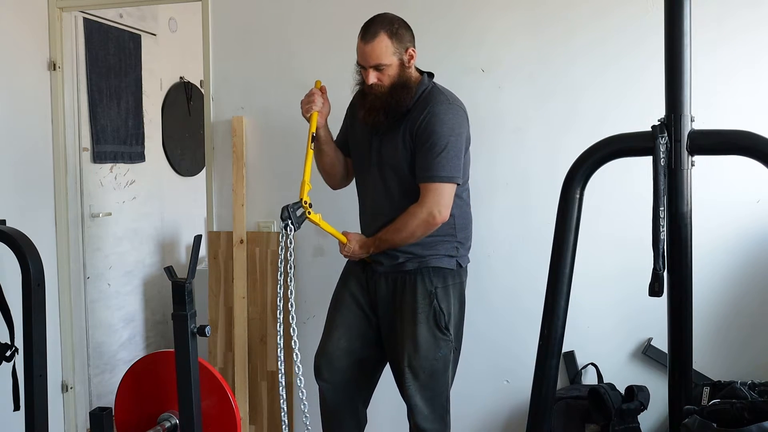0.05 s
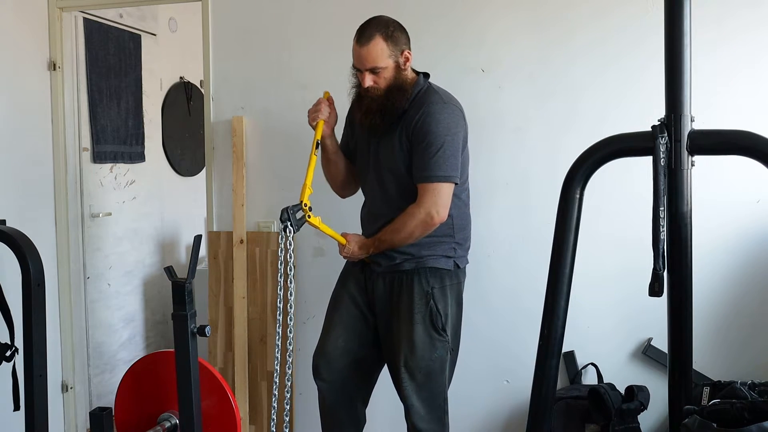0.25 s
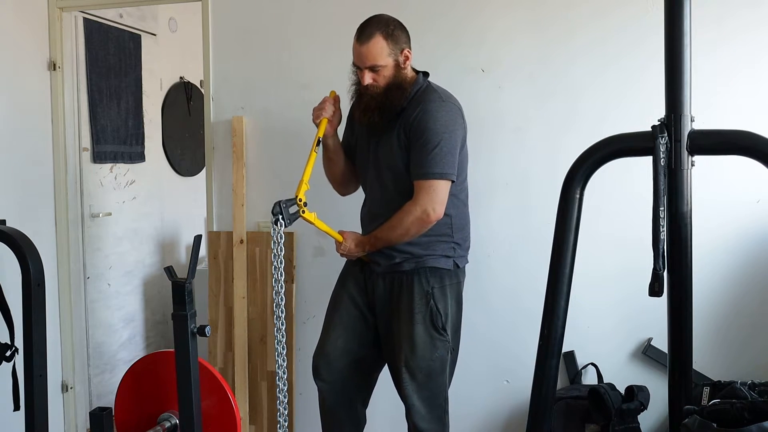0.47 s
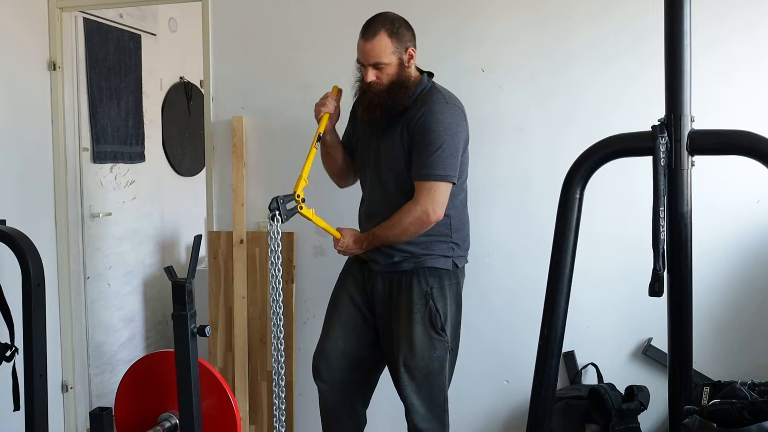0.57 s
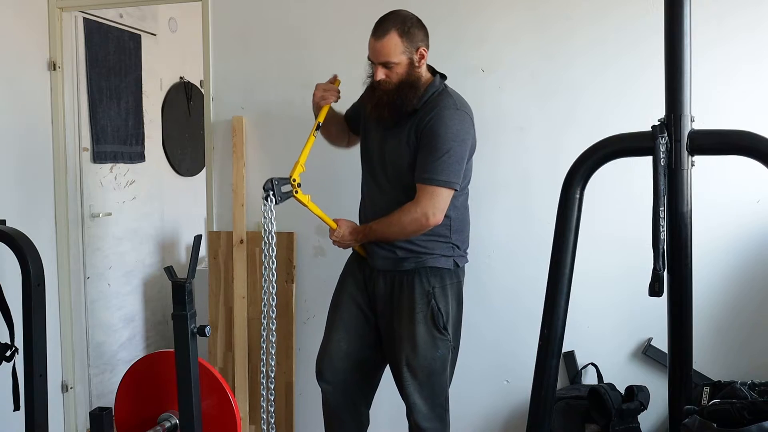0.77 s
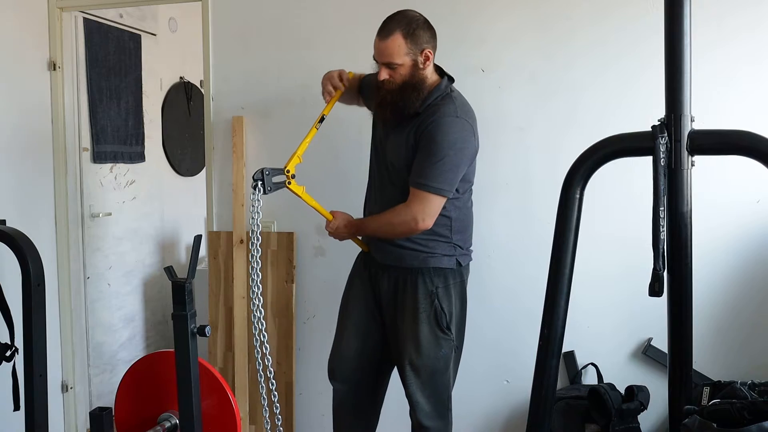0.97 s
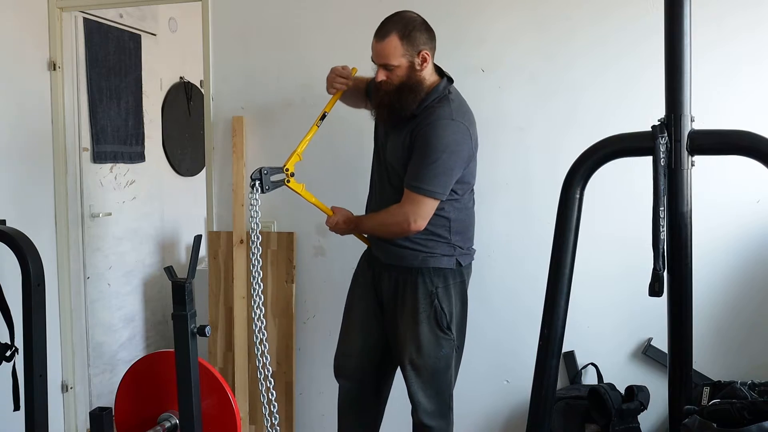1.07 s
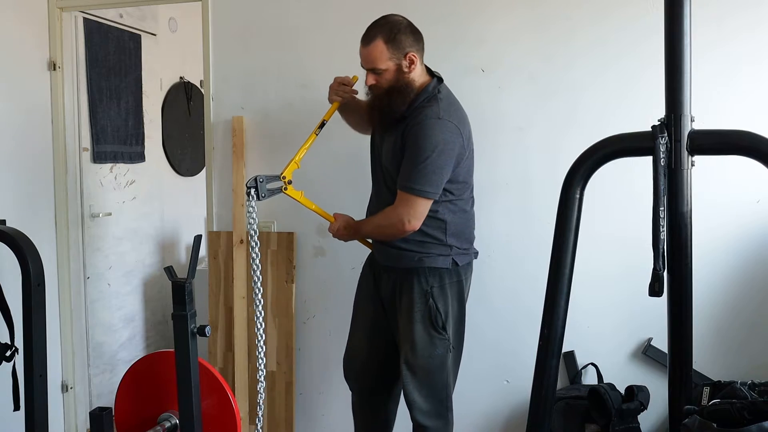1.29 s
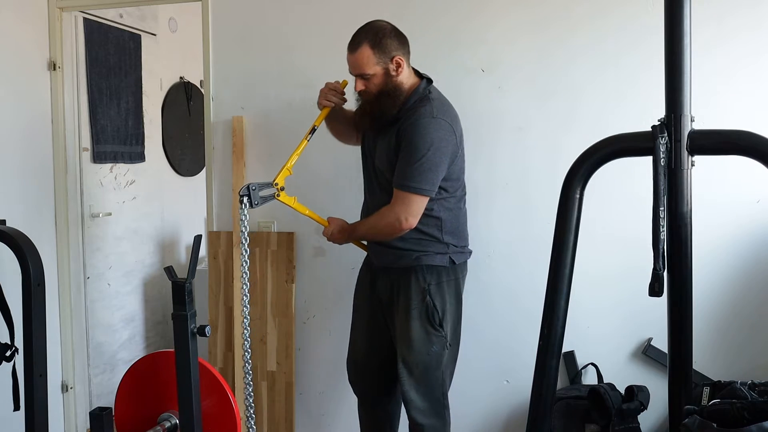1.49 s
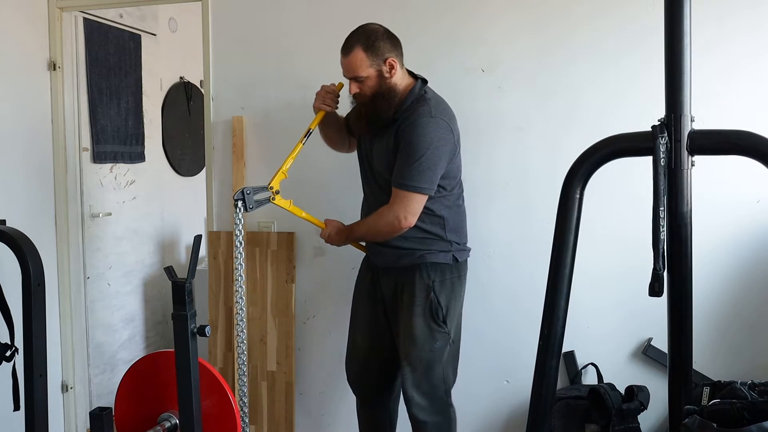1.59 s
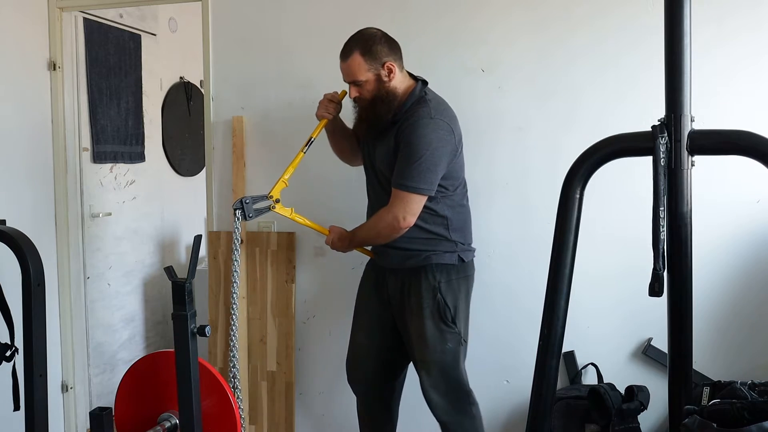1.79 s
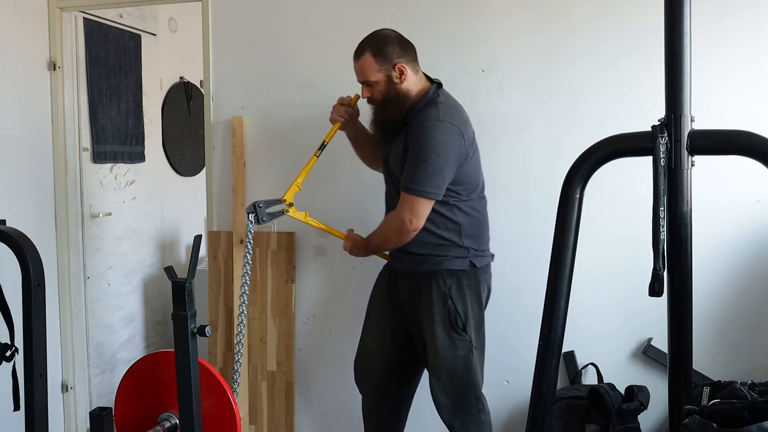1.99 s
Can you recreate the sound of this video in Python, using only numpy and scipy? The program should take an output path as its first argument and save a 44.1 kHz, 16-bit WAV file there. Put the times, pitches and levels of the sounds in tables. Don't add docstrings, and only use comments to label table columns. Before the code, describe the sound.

Bolt cutters clank hard on a steel chain, ringing briefly, then light link clicks and scuffs

```python
import sys
import numpy as np
from scipy import signal
from scipy.io import wavfile
from scipy.ndimage import uniform_filter1d

SR = 44100
rng = np.random.default_rng(int(sys.argv[2]) if len(sys.argv) > 2 else 0)


def ratio_of_db(decibels):
    return 10 ** (np.asarray(decibels, float) / 20)


def digitize_waveform(pressure):
    field = np.atleast_2d(pressure).T
    bounded = np.clip(field, -1, 1)
    quanta = np.round(bounded * 32767).astype(np.int16)
    wavfile.write(sys.argv[1], SR, quanta)


N = 90404
LEAD_S = 0.1
M = N + round(LEAD_S * SR)


def evened(x):
    return x / np.sqrt(np.mean(x ** 2) + 1e-20)


def read(points, hz):
    f, value = np.transpose(points)
    return np.interp(np.log(hz + 1), np.log(f + 1), value)


def add(mix, start_s, sound):
    part = mix[round((start_s + LEAD_S) * SR):][:len(sound)]
    part += sound[:len(part)]


def high_pass(x, hz):
    return signal.sosfilt(signal.butter(N=4, Wn=hz, btype="high", fs=SR, output="sos"), x)


def click(tone, tilt_db=0):
    hz = abs(np.fft.fftfreq(2048, 1 / SR))
    gain_db = read(tone, hz) + tilt_db * np.log2((hz + 200) / 4000)
    log_gain = np.log(ratio_of_db(np.maximum(gain_db, -80)))
    pulse = np.fft.ifft(np.exp(np.conj(signal.hilbert(log_gain)))).real[:1024]
    return pulse / np.linalg.norm(pulse)


def ring(modes, spread_db=4.5):
    flutter_db, flutter_s = 3.0, 0.015
    t = np.arange(SR) / SR
    knots_s = np.arange(0, 1 + flutter_s, flutter_s)
    out = np.zeros(SR)
    for hz, db, t60_s in modes:
        luck_db = spread_db * rng.standard_normal()
        waver_db = flutter_db * np.interp(t, knots_s, rng.standard_normal(len(knots_s)))
        out += ratio_of_db(db + luck_db + waver_db - 60 * t / t60_s) * np.sin(2 * np.pi * hz * t)
    return out


def room(x, tail_db, echo=1):
    # freq_hz, t60_s
    decay = [(200, 0.16), (800, 0.72), (2000, 0.46), (4000, 0.58), (8000, 0.41), (15000, 0.26)]
    # freq_hz, share common to both ears
    tail_shared = [(150, 1), (500, 0.87), (1500, 0), (8000, 0.46)]
    # delay_s, left_gain, right_gain
    echoes = [(.0016, .4, .3), (.0053, .6, .4), (.008, .2, .3), (.0118, .4, .3), (.0147, .3, .35),
              (.0205, .7, .4)]
    hold_s, rise_s, direct_pan_db = 0.028, 0.003, 2

    hz, t, z = signal.stft(rng.standard_normal((3, SR)), SR, nperseg=256)
    shared = np.clip(read(tail_shared, hz), 0, 1)[:, None]
    z = shared * z[2] + np.sqrt(1 - shared ** 2) * z[:2]
    z = z * ratio_of_db(-60 * np.maximum(t - hold_s, 0) / read(decay, hz)[:, None])
    tail = signal.istft(z, SR, nperseg=256)[1][:, :SR]
    tail = tail * (1 - np.exp(-np.arange(SR) / SR / rise_s))
    tail = ratio_of_db(tail_db) * tail / np.linalg.norm(tail[0])

    tail[:, 0] += ratio_of_db(np.array([direct_pan_db, -direct_pan_db]) / 2)
    for delay_s, left, right in echoes:
        at = round(delay_s * SR) + rng.integers(0, 6, 2)
        tail[[0, 1], at] += echo * left, echo * right
    return signal.fftconvolve(x[None], tail, axes=1)[:, M - N:M]


def blows(rows, tone, modes, crack_s, tail_db, ring_tail_db):
    steel_low_hz = 475
    cracks, rings, t = np.zeros(M), np.zeros(M), np.arange(1500) / SR
    for start_s, blow_db, ring_db in rows:
        crack = rng.standard_normal(1500) * np.exp(-t / crack_s)
        crack[0] += 2.5
        crack = crack / np.linalg.norm(crack)
        add(cracks, start_s, ratio_of_db(blow_db) * np.convolve(crack, click(tone)))
        add(rings, start_s, ratio_of_db(ring_db - 12) * ring(modes))
    return high_pass(room(cracks, tail_db) + room(rings, ring_tail_db), steel_low_hz)


def hiss():
    # freq_hz, level_db
    hiss_tone = [(25, -11), (60, -14), (154, -5.5), (400, -12), (1220, -13.5), (3000, -21), (15600, -31.5),
                 (16100, -75)]
    # freq_hz, correlation of the two ears
    likeness = [(60, 0.94), (200, 0.82), (550, 0.68), (1650, 0.23), (5000, 0.01)]
    level_db = -54.5

    frames, hz = N // 256 + 5, np.fft.rfftfreq(1024, 1 / SR)
    a, b, c, d = rng.standard_normal((frames, 513, 4)).T
    same = np.clip(read(likeness, hz), -1, 1)[:, None]
    left = a + 1j * b
    right = same * left + np.sqrt(1 - same ** 2) * (c + 1j * d)
    z = np.array([left, right]) * ratio_of_db(read(hiss_tone, hz))[:, None]
    out = signal.istft(z, nperseg=1024, noverlap=768)[1][:, :N]
    return ratio_of_db(level_db + 1) * evened(out)


def hum():
    # freq_hz, width_hz, level_db
    lines = [(153.3, 3, -62), (126.7, 7.1, -62), (201, 9.2, -71.5), (60.4, 13, -87)]
    swell_s, swell_width_s, swell_peak_db = 1.44, 0.22, 5

    t, out = np.arange(N) / SR, np.zeros(N)
    swell_db = swell_peak_db * np.exp(-((t - swell_s) / swell_width_s) ** 2)
    for hz, width_hz, db in lines:
        r = np.exp(-np.pi * width_hz / SR)
        noise = rng.standard_normal(N) + 1j * rng.standard_normal(N)
        slow = signal.lfilter([1], [1, -r], noise)
        out += ratio_of_db(db + swell_db) * evened((slow * np.exp(2j * np.pi * hz * t)).real)
    return out


def room_floor():
    return (hiss() + hum()) * ratio_of_db(np.array([[0.4], [-0.4]]))


def scuffs():
    # start_s, rise_s, hold_s, level_db, tilt_db_per_octave
    strokes = [
        (0.518, 0.0029, 0.016, -50.5, 1.5),
        (0.56, 0.0033, 0.033, -46.5, 2.5),
        (1.40, 0.032, 0.035, -47.5, -1.5),
        (1.46, 0.033, 0.036, -78, -3),
        (1.626, 0.0031, 0.021, -37, 4.5),
        (1.918, 0.007, 0.015, -56, -3),
        (1, 0.11, 0.4, -69, -4),
    ]
    # freq_hz, level_db
    scuff_tone = [(300, -47), (800, -15.5), (1500, -8.5), (3240, -4), (6000, -6), (9490, -13), (15400, -22),
                  (16300, -38)]
    grains_per_s, grain_spread_db, release_s = 9000, 3.0, 0.012

    out, t = np.zeros(M), np.arange(SR // 2) / SR
    for start_s, rise_s, hold_s, db, tilt_db in strokes:
        release = np.exp(-np.maximum(t - rise_s - hold_s, 0) / release_s)
        stroke = np.minimum(t / rise_s, 1) ** 2 * release
        size = ratio_of_db(grain_spread_db * np.minimum(rng.exponential(1, len(t)), 3))
        size = size * rng.choice([-1., 1.], len(t))
        grains = evened(size * (rng.random(len(t)) < grains_per_s / SR))
        add(out, start_s, ratio_of_db(db) * np.convolve(grains * stroke, click(scuff_tone, tilt_db)))
    return room(out, tail_db=5.5)


def knocks():
    # start_s, level_db, freq_hz, width_hz
    hits = [
        (0.5243, -49, 68.5, 40.3),
        (0.5218, -41.5, 213, 150),
        (.523, -37, 705, 800),
        (1.461, -35, 1710, 506),
        (1.662, -31, 1404, 830),
    ]
    out, t = np.zeros(M), np.arange(1600) / SR
    for start_s, db, hz, width_hz in hits:
        body = t * np.exp(-2 * np.pi * width_hz * t) * np.sin(2 * np.pi * hz * t)
        puff = np.convolve(rng.standard_normal(1600) * np.exp(-t / 0.0047), body)
        add(out, start_s, ratio_of_db(db) * puff / abs(puff).max())
    return room(out, tail_db=6)


def tinks():
    # start_s, level_db, freq_hz, t60_s
    touches = [(0.2088, -17, 7600, 0.035), (0.2113, -10.5, 9570, .04), (0.526, -48.5, 11760, 0.039),
               (.632, -53, 13050, .1), (.645, -48.5, 13050, .15), (1.312, -45, 3400, 0.024),
               (1.3119, -43.5, 4820, 0.017), (1.3133, -49.5, 5550, 0.037), (1.344, -42.5, 3390, 0.017),
               (1.3441, -41.5, 4770, 0.021), (1.346, -49.5, 2330, 0.063), (1.361, -58.5, 13070, 0.043),
               (1.826, -50, 2340, 0.095), (1.8258, -45.5, 3150, 0.03)]
    out = np.zeros(M)
    for start_s, db, hz, t60_s in touches:
        add(out, start_s, ring([(hz, db, t60_s)], spread_db=0))
    return room(out, tail_db=-2, echo=0.35)


def link_snaps():
    # start_s, blow_db, ring_db
    snaps = [
        (.5645, -26, -80),
        (.7583, -11, -36),
        (1.5, -43, -80),
        (1.6792, -20.5, -81),
    ]
    # freq_hz, level_db
    snap_tone = [(800, -15), (2000, 0.5), (3300, 1), (4400, 6), (8000, 7.5), (12000, 2.5), (15600, -6.5),
                 (16800, -20)]
    # freq_hz, level_db, t60_s
    snap_modes = [(12970, -5.5, 0.091), (13010, 2, 0.37), (13000, 20.5, 0.033)]
    return blows(snaps, snap_tone, snap_modes, crack_s=0.00005, tail_db=11, ring_tail_db=1)


def earlier_rattle():
    # start_s, blow_db, ring_db
    rattle = [
        (-.035, -2, -22),
        (-.02, -9, -22.5),
        (-.006, -13, -20.5),
    ]
    # freq_hz, level_db
    rattle_tone = [(120, -50), (200, -26), (1020, -24), (1350, -25), (1980, -8), (5940, -9), (11900, -21.5),
                   (13300, -31), (16000, -113.5)]
    # freq_hz, level_db, t60_s
    link_modes = [(1760, -18, 0.54), (2024, -4, 0.041), (2844, 0.5, 0.045), (4460, -2, 0.21),
                  (5260, 4.5, 0.044), (5920, 6, 0.11), (6500, -27.5, 0.15), (7940, -11.5, 0.038),
                  (12950, -8, 0.17)]
    return blows(rattle, rattle_tone, link_modes, crack_s=0.013, tail_db=9, ring_tail_db=-5.5)


def jaw_clanks():
    # start_s, blow_db, ring_db
    clanks = [
        (.2005, -14, -13),
        (.2072, 13.5, -5.5),
        (.2130, 15, -19),
        (.226, -2.5, -11.5),
        (.2545, -4.5, -22),
        (.306, -1.5, -20.5),
        (.325, -12.5, -32.5),
    ]
    # freq_hz, level_db
    clank_tone = [(250, -39), (600, -26.5), (1300, -11.5), (2300, -3.5), (3000, -7.5), (4200, -8.5),
                  (9500, -14.5), (16000, -44.5)]
    jaw_hz = [1680, 1931, 2000, 2022, 2045, 2486, 3655, 3900, 4055, 4093, 4455, 5070, 5805, 12970]
    # level_db, t60_s
    jaw_levels = [(-17, 0.63), (-8.5, 0.24), (-3, .5), (-5.5, 0.38), (5.5, 0.29), (-3, 0.081), (-14, .4),
                  (-5.5, 0.15), (-12, 0.17), (-7.5, 0.25), (-8.5, 0.24), (-24, 0.27), (-13, 0.18),
                  (-30, .2)]
    modes = [(hz, db, t60_s) for hz, (db, t60_s) in zip(jaw_hz, jaw_levels)]
    return blows(clanks, clank_tone, modes, crack_s=0.0064, tail_db=3, ring_tail_db=3)


def scene():
    mic_low_hz = 42
    steel = earlier_rattle() + link_snaps() + jaw_clanks()
    return high_pass(room_floor() + scuffs() + knocks() + tinks() + steel, mic_low_hz)


def low_pass(x):
    return signal.sosfilt(signal.butter(12, 16830, fs=SR, output="sos"), x)


def record(dry):
    duck_from_db, duck_share, recover_db_per_s = -40, 0.15, 45
    power_db = 10 * np.log10(abs(uniform_filter1d((dry ** 2).mean(0), 400)) + 1e-12)
    fall_db = np.arange(N) * recover_db_per_s / SR
    held_db = np.maximum.accumulate(power_db + fall_db) - fall_db
    over_db = np.maximum(held_db - duck_from_db, 0)
    duck_db = duck_share * uniform_filter1d(over_db, 200)
    mix = np.tanh(dry / ratio_of_db(duck_db))
    return low_pass(mix)


dry = scene()
out = record(dry)
digitize_waveform(out)
```